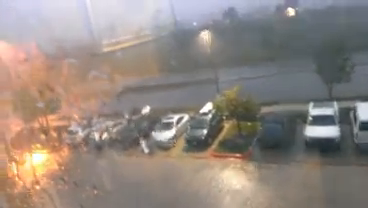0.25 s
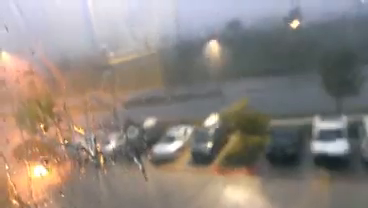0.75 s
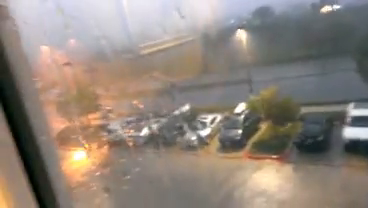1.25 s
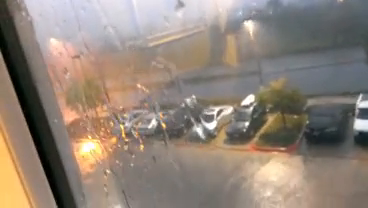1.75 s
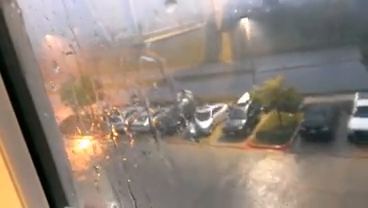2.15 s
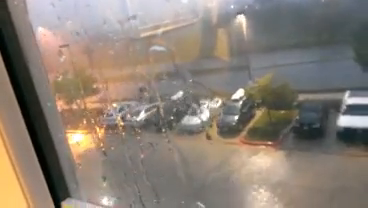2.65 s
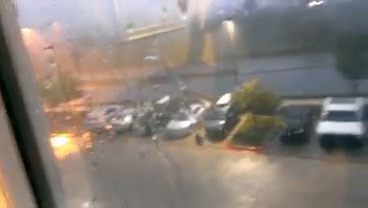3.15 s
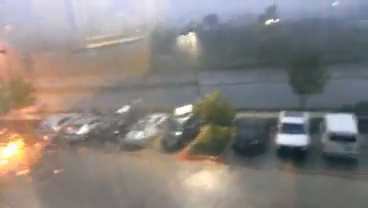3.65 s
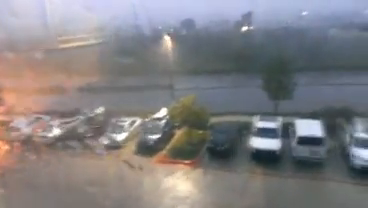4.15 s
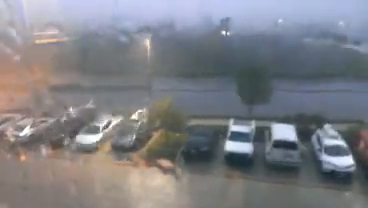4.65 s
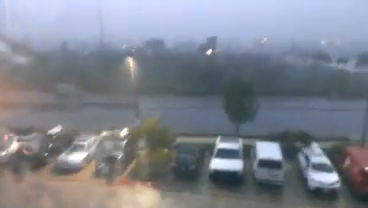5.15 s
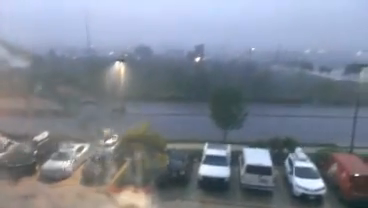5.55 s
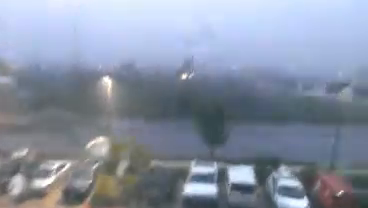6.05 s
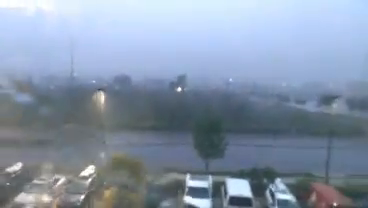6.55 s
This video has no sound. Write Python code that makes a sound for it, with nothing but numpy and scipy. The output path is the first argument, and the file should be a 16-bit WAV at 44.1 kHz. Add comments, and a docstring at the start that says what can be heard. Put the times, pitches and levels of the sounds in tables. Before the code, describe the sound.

Heard from a room, close to a wet window: gusts throw crackling spray at the glass, and separate big drops tick and knock sharply. Drips plop on the sill, a few dull thuds flex the pane, and fine patter fizzes throughout. The rain eases around the third second, then grows heavier with its loudest drops after four seconds. Outside, the downpour washes over a parking lot above a faint low rumble and hum.

```python
"""Heavy rain blows against a window in spells; the microphone stands close to the glass, in the room behind it.
Gusts throw sheets of fine spray at the pane and big drops tick on it: each blow shakes noisy, decaying modes.
Fat drips plop on the sill, dull thuds flex the pane and tiny bubbles plink: short rings of a few partials.
The water film fizzes and the sill patters with many chance-pitched rings; the pane drums softly.
Farther off, the downpour on the parking lot, a low rumble and a wavering hum are shaped noise."""
import sys
import numpy as np
from scipy import signal
from scipy.fft import rfft, irfft, next_fast_len
from scipy.io import wavfile
from scipy.ndimage import uniform_filter1d

SR = 44100
rng = np.random.default_rng(int(sys.argv[2]) if len(sys.argv) > 2 else 0)


def master_out(mix):
    """Clip the mix to full scale and print it as 16-bit PCM to the path in sys.argv[1]."""
    frames = np.transpose(np.atleast_2d(mix))
    ceiling = np.clip(frames, -1, 1)
    pcm = np.round(ceiling * 32767).astype(np.int16)
    wavfile.write(sys.argv[1], SR, pcm)


N = 299439


def amp(db):
    """Decibels to gain."""
    return 10 ** (np.asarray(db) / 20)


def unit(x):
    """Scale to rms 1."""
    return x / np.sqrt(np.mean(x ** 2) + 1e-20)


def along(points, hz):
    """Read (f/Hz, value) points on a log frequency axis."""
    f, v = np.transpose(points)
    return np.interp(np.log(hz + 1), np.log(f + 1), v)


def curves(rows):
    """One value per sample for each column after the time."""
    s, *cols = np.transpose(rows)
    return [np.interp(np.arange(N) / SR, s, c) for c in cols]


def filtered(x, response):
    """x times a response of frequency; zero padding gives the filter's tail room."""
    m = next_fast_len(N + 8192)
    gain = response(np.fft.rfftfreq(m, 1 / SR))
    return irfft(rfft(x, m) * gain, m)[:N]


def pane(times, drop_db, rise, lag, damping):
    """Drops shake the crowded modes of the glass; drop_db(Hz) gives each drop's strength in a band."""
    # the pane's answer to a drop: f/Hz, relative level/dB, t60/s before damping shortens it
    glass_modes = [(278, -4, 0.044), (750, -3.5, 0.023), (1380, -0.5, 0.05), (2235, -5.5, 0.09),
                   (3320, 2.5, 0.036), (4350, -4, 0.046), (4540, -1.5, 0.046), (6420, -7.5, 0.036),
                   (7200, -16.5, 0.039), (10020, -26, 0.062), (12300, -34, 0.036)]
    t = np.arange(SR // 10) / SR
    centres = np.array(glass_modes)[:, 0]
    at = np.clip(np.round(times * SR).astype(int), 0, N - 1)
    out = np.zeros(N)
    for (hz, db, t60), band in zip(glass_modes, np.eye(len(glass_modes))):
        # bending waves are dispersive: the treble arrives first and swells fastest
        slow = np.sqrt(3000 / hz)
        age = np.maximum(t - lag * slow, 0)
        swell = 1 - np.exp(-(age / (rise * slow)) ** 2)
        ring = swell * amp(-60 * age * damping / t60)
        blows = np.bincount(at, amp(db + drop_db(hz)) ** 2, N)
        power = np.abs(signal.oaconvolve(blows, ring ** 2)[:N])

        def band_gain(f):
            """Share of this band, falling off below the lowest mode."""
            return np.sqrt(along(np.c_[centres, band], f) * np.minimum(f / centres[0], 1) ** 4)

        modes = filtered(rng.standard_normal(N), band_gain)
        out += np.sqrt(power) * modes
    return out


def sheets():
    """Gain of the wind-blown sheets of small drops: each builds up, slowly thins out and dies away."""
    # gusts of spray: arrival at full strength t/s, length/s, level/dB halfway through
    gusts = [(0.0, 0.04, -49.5), (0.227, 0.054, -44), (0.49, 0.1, -47.5), (0.737, 0.086, -44),
             (0.86, 0.14, -51.5), (1.523, 0.15, -45.5), (1.76, 0.09, -44.5), (2.036, 0.1, -43),
             (2.235, 0.29, -49.5), (2.883, 0.14, -52.5), (3.134, 0.15, -45), (3.567, 0.12, -47),
             (3.66, 0.16, -44), (3.838, 0.14, -45.5), (3.999, 0.18, -41.5), (4.314, 0.29, -42.5),
             (4.79, 0.22, -49.5), (5.02, 0.1, -43), (5.31, 0.049, -46.5), (5.716, 0.023, -48.5),
             (5.872, 0.096, -40.5), (6.08, 0.22, -46), (6.52, 0.21, -49), (6.687, 0.08, -44.5)]
    attack_s, release_s, sag_db_per_s = 0.03, 0.062, 7
    t = np.arange(N) / SR
    power = np.zeros(N)
    for s, length, db in gusts:
        attack = np.clip(1 + (t - s) / attack_s, 0, 1)
        sag_db = sag_db_per_s * (np.clip(t - s, 0, length) - length / 2)
        release = np.exp(-np.maximum(t - s - length, 0) / release_s)
        power += (amp(db - sag_db) * attack * release) ** 2
    return np.sqrt(power)


def spray(level_db, count, spread_db, favour_db, colour_db, brighten):
    """Countless small drops shake the glass; harder sheets of rain splash brighter."""
    slot, rank = rng.random((count, 2)).T
    when = (np.arange(count) + slot) / count  # share of the whole duration
    sheet_db = level_db[(when * N).astype(int)]
    size_db = sheet_db + spread_db * rank ** 3  # few drops are large
    # size and place of impact decide which part of the pane's range a drop favours
    own_hz = 3200 * np.exp(rng.normal(0, 0.69, count))

    def drop_db(hz):
        """Strength of each drop in the band at hz."""
        favour = favour_db * np.exp(-(np.log(hz / own_hz) / 0.2) ** 2)
        treble = np.clip(np.log2(hz / 4500), 0, 1)
        splash = brighten * (sheet_db - sheet_db.mean()) * treble
        return size_db + favour + splash + colour_db * rng.standard_normal(count)

    ticks = pane(when * N / SR, drop_db, rise=.0009, lag=.0003, damping=1.1)
    return unit(ticks) * np.sqrt(np.mean(amp(level_db) ** 2))


def big_drops(gain_db=6.5, knock_db=11, splash_db=13, ping_db=-1.0, ping_share=1.0):
    """Single drops near the microphone shake the pane; a splashier drop also pings the upper modes harder."""
    # drops on the glass: t/s, level/dB before gain_db, knock/dB and splash/dB
    # (both relative to the body of the tick, before knock_db and splash_db)
    drops = [(0.216, -22.5, -21, -24), (0.2244, -32, -22, -6.5), (0.4948, -27.5, -13, -20.5),
             (0.529, -25.5, -14, -18), (0.561, -30.5, -13, -21), (0.719, -27.5, -10, -22),
             (0.7354, -22.5, -21, -23), (0.7538, -22, -16, -18), (0.806, -22, -12, -22),
             (0.859, -21, -17, -14.5), (0.9342, -26.5, -19, -24), (0.9732, -25.5, -21, -27),
             (1.0205, -17.5, -25, -7), (1.505, -24, -24, -16), (1.5856, -22.5, -20, -14.5),
             (1.5985, -21.5, -28, -10.5), (1.6126, -24, -28, -16), (1.705, -23.5, -15, -24.5),
             (1.773, -25, -23, -16.5), (1.826, -32, -3, -22), (1.8921, -23.5, -30, -14),
             (1.9444, -26.5, -23, -22), (2.0262, -30.5, -14, -11), (2.1228, -28.5, -12, -6.5),
             (2.4433, -35, -7, -6.5), (2.7011, -30.5, -13, -24), (2.7477, -32, -11, -12.5),
             (2.7721, -34, -6, -13.5), (2.837, -33.5, -16, -20), (2.8932, -28.5, -24, -14.5),
             (2.9854, -27.5, -22, -18), (3.0131, -34, -18, -13), (3.0921, -24, -9.5, -14),
             (3.1522, -21.5, -27, -18), (3.293, -34, -3, -15), (3.343, -25, -21, -8), (3.384, -39, 2, -1),
             (3.6144, -30.5, -13, -11), (3.9624, -23.5, -8, -13.5), (4.2934, -12, -18, -15.5),
             (4.396, -24, -10, -11), (4.4087, -26, -6, -11), (4.4565, -22, -23, -29), (4.5216, -29, -6, -5),
             (4.6438, -26, -16, -22), (4.79, -27.5, -10, -16), (4.9394, -32.5, -2, -5.5),
             (5.0393, -27, -9, -12.5), (5.1663, -10.5, -19, -14), (5.2123, -25, -17, -17),
             (5.3343, -28, -9, -29), (5.38, -25, -16, -23), (5.477, -32, -17, -16),
             (5.5147, -28, -9, -12.5), (5.8264, -27, -23, -7), (5.904, -32.5, 8, -11),
             (6.329, -28.5, -8, -27), (6.502, -25.5, -35, -15.5), (6.6255, -25.5, -2.5, -2),
             (6.7208, -26, -3, -18), (6.7461, -22, -4, -13)]
    s, db, knock, splash = np.transpose(drops)
    flat, bright = np.zeros(len(s)), splash + splash_db
    ping = ping_db + ping_share * bright
    colour = np.c_[flat, knock + knock_db, flat, ping, bright]
    colour_hz = [500, 1300, 3100, 5400, 8500]

    def drop_db(hz):
        """Strength of each drop in the band at hz."""
        return db + np.array([along(np.c_[colour_hz, c], hz) for c in colour])

    # the blow comes a moment before the time in the table, as the modes need time to swell
    ticks = pane(s - .001, drop_db, rise=.0008, lag=.0003, damping=1.25)
    return amp(gain_db) * ticks


def rings(events, partials, t60, rise, glide):
    """Each (t/s, level/dB, f/Hz) event rings (ratio, level/dB) partials; glide is the relative rise per second."""
    t = np.arange(SR // 5) / SR
    ratio, level = np.transpose(partials)[:, :, None]
    envelope = (1 - np.exp(-t / rise)) * amp(-60 * t / t60)
    out = np.zeros(N + len(t))
    for s, db, hz in events:
        detune = 1 + rng.normal(0, 0.0031, ratio.shape)
        cycles = hz * ratio * detune * t * (1 + glide * t / 2)
        ring = np.sum(amp(level) * np.sin(2 * np.pi * cycles), axis=0)
        out[round(s * SR):][:len(t)] += amp(db) * ring * envelope
    return out[:N]


def plops():
    """A fat drip rings a close cluster of sill modes for a few cycles."""
    # fat drips on the sill: t/s, level/dB before the gain below, base f/Hz
    drips = [(1.192, -23.5, 1100), (1.7658, -25.5, 1180), (2.067, -25, 1270), (3.0697, -26.5, 1170),
             (3.0974, -24, 1260), (3.9615, -25, 1650), (4.2476, -13, 1200), (4.2882, -16.5, 1280),
             (4.5603, -24, 1060), (5.0887, -19.5, 1194), (5.113, -19.5, 1160), (5.16, -22.5, 1420),
             (5.2602, -9.5, 1276), (5.907, -13, 1080), (5.9992, -20.5, 1060), (6.3034, -26.5, 1250),
             (6.7245, -29, 1370)]
    partials = [(0.99, 2.5), (1.035, -17), (1.26, -7), (4.2, -17)]
    return amp(3) * rings(drips, partials, t60=0.014, rise=0.002, glide=0)


def thuds():
    """Wind-blown sheets of rain slap the pane and flex it whole; its lowest modes give a dull, well damped
    knock."""
    # slaps of wind-blown sheets: t/s, level/dB before the gain below, base f/Hz
    sheet_slaps = [(0.724, -32, 205), (0.764, -25.5, 323), (1.019, -27.5, 337), (1.585, -34, 213),
                   (1.774, -23, 305), (4.05, -21.5, 247), (4.403, -29, 348), (5.359, -27, 371),
                   (6.623, -23, 349)]
    partials = [(1.014, 0), (0.8, -15.0), (1.316, -9.5), (1.92, -8.5)]
    return amp(-4.5) * rings(sheet_slaps, partials, t60=0.047, rise=0.0012, glide=0)


def plinks():
    """A tiny bubble in the water film rings briefly and rises in pitch as it surfaces."""
    # bubbles: t/s, level/dB before the gain below, starting f/Hz
    bubbles = [(0.125, -39, 5500), (2.7357, -30.5, 5560), (2.9357, -25.5, 4700), (3.1892, -25, 5200),
               (3.9937, -33, 5360), (5.968, -19, 5560)]
    return amp(3) * rings(bubbles, [(1, -2.5), (1.1, -12)], t60=0.013, rise=0.00031, glide=17)


def patter(body, centre_hz, count, spread_db, scatter, t60):
    """Many small drops, each a short ring at a chance pitch, coloured by the body they land on; rms 1."""
    when, rank, phase = rng.random((count, 3)).T[:, :, None]
    hz = np.minimum(centre_hz * np.exp(rng.normal(0, scatter, (count, 1))), SR / 3)
    t = np.arange(SR // 64) / SR
    swell = 1 - np.exp(-t * hz / 2)  # the ring builds up over about two cycles
    decay = amp(spread_db * rank ** 4 - 60 * t / t60)
    drops = decay * swell * np.sin(2 * np.pi * (hz * t + phase))
    at = (when * N).astype(int) + np.arange(len(t))
    drips = np.bincount(at.ravel(), drops.ravel(), N)[:N]
    return unit(filtered(drips, lambda f: amp(along(body, f))))


def film_fizz(spray_db):
    """Droplets that land in the running water film fizz along with the spray, 6 dB below it."""
    # colour of the film on the glass: f/Hz, relative level/dB
    film_colour = [(1200, -24), (2500, 4.5), (4000, -3), (5800, 2.5), (6800, -14.5), (9000, -11.5),
                   (12000, -22)]
    fizz = patter(film_colour, centre_hz=4200, count=2400, spread_db=14, scatter=.36, t60=.015)
    return amp(spray_db - 6) * fizz


def sill_patter(heavier_db):
    """Small drops ring the sill; both its resonances get louder in harder rain, the lower a little faster."""
    # the sill's lower and upper resonance: f/Hz, relative level/dB
    lower_body = [(300, -22), (700, -0.5), (1000, -6), (1300, -2), (1600, -10.5), (2200, -34), (7000, -44)]
    upper_body = [(1800, -33), (2500, -6), (2950, -5.5), (3400, -5.5), (4500, -22)]
    # level in usual rain (dB), and dB gained per dB of heavier rain
    lower_db, lower_grows = -51.5, 1.8
    upper_db, upper_grows = -54.5, 1.57
    lower = patter(lower_body, centre_hz=1276, count=1800, spread_db=7.5, scatter=0.231, t60=0.016)
    upper = patter(upper_body, centre_hz=2954, count=1800, spread_db=11, scatter=0.097, t60=0.015)
    return amp(lower_db + lower_grows * heavier_db) * lower + amp(upper_db + upper_grows * heavier_db) * upper


def room(x, t60=0.13, gap=0.0031):
    """The short tail of a furnished room, a decaying noise burst after a gap, softened in the treble."""
    t = np.arange(SR // 3) / SR
    tail = rng.standard_normal(len(t)) * amp(-60 * t / t60) * (t > gap)
    wet = signal.oaconvolve(x, tail / np.linalg.norm(tail))[:N]
    return filtered(wet, lambda f: 1 / np.sqrt(1 + (f / 6000) ** 4))


def rush(spectrum, patchy_db):
    """Coloured noise of rms 1 with patches of random gain in time and frequency."""
    z = signal.stft(rng.standard_normal(N), nperseg=512)[2]
    field = uniform_filter1d(rng.standard_normal(z.shape), size=6, axis=0)
    field = uniform_filter1d(field, size=10, axis=1)
    x = signal.istft(z * amp(patchy_db * unit(field)), nperseg=512)[1][:N]
    return unit(filtered(x, lambda hz: amp(along(spectrum, hz))))


def drumming(heavier_db, spray_db):
    """The pane drums softly: patchy low noise that grows with the rain and partly follows the spray."""
    # colour of the drumming: f/Hz, relative level/dB
    drum_colour = [(60, -20), (110, -3), (135, -3.5), (165, -4), (210, 2), (275, -5), (345, 0), (430, -5.5),
                   (650, -10), (1000, -16.5), (2000, -73)]
    # dB per dB of heavier rain, and of spray above its mean
    grows, follows_spray = 0.62, 0.31
    drum_db = -48 + grows * heavier_db + follows_spray * (spray_db - spray_db.mean())
    return amp(drum_db) * rush(drum_colour, patchy_db=3.0)


def downpour_wash(heavier_db):
    """The downpour over the parking lot outside merges into patchy noise that grows with the rain."""
    # colour of the wash: f/Hz, relative level/dB
    wash_colour = [(100, 6), (300, 5.5), (500, 1), (700, -3.5), (950, 0), (1250, 5.5), (2000, 5),
                   (3000, -1.5), (4200, -2.5), (5600, -6), (7000, -21), (12000, -34.5)]
    # level in usual rain (dB), and dB gained per dB of heavier rain
    usual_db, grows = -45, 0.81
    return amp(usual_db + grows * heavier_db) * rush(wash_colour, patchy_db=2.0)


def rumble():
    """A low rumble under the rain: nearly even noise in the deep bass, with a drifting level."""
    # colour of the rumble: f/Hz, relative level/dB
    rumble_colour = [(10, -9), (20, -6.5), (27, -2), (38, -7), (55, -15), (85, -21.5), (150, -17),
                     (400, -86)]
    # its course: t/s, level/dB
    rumble_course = [(0, -46), (0.55, -52), (0.85, -47), (1.3, -47), (2.7, -46.5), (3.7, -49.5),
                     (5.8, -44.5), (6.0, -41.5), (6.25, -48), (6.79, -49.5)]
    return amp(curves(rumble_course)[0]) * rush(rumble_colour, patchy_db=0.5)


def hum(hz=98, half_width_hz=8):
    """A wavering low drone: a band of noise so narrow that its strength wanders."""
    # its course: t/s, level/dB
    hum_course = [(0, -50), (0.6, -52.5), (1.2, -55), (2.9, -53.5), (3.7, -57.5), (5.7, -55.5), (6.79, -64)]
    drone = filtered(rng.standard_normal(N), lambda f: 1 / (1 + ((f - hz) / half_width_hz) ** 4))
    return amp(curves(hum_course)[0]) * unit(drone)


def scene():
    """Rain on glass and sill close by, the wash of the downpour outside, rumble and hum underneath."""
    # how hard it rains; drives wash, sill, drumming and steady spray: t/s, strength/dB
    rain_course = [(0.0, -49), (0.43, -49.5), (0.74, -45), (1.19, -50.5), (1.93, -46), (2.27, -46.5),
                   (2.68, -52), (3.57, -50), (4.42, -39.5), (4.65, -44), (4.82, -43.5), (5.09, -40.5),
                   (5.54, -46), (5.77, -44), (6.09, -39.5), (6.35, -48), (6.58, -45), (6.79, -42)]
    heavier_db = curves(rain_course)[0] + 46  # usual rain is -46 dB
    steady_spray_db = -53.5 + heavier_db
    spray_db = 20 * np.log10(np.hypot(amp(steady_spray_db), sheets()))
    glass = spray(spray_db, count=900, spread_db=11.0, favour_db=7.5, colour_db=2.5, brighten=0.8)
    near = big_drops() + plops() + thuds() + plinks()
    near_in_room = near + amp(-12.0) * room(near)
    wet_surfaces = film_fizz(spray_db) + sill_patter(heavier_db)
    background = drumming(heavier_db, spray_db) + downpour_wash(heavier_db) + rumble() + hum()
    return (glass + near_in_room + wet_surfaces + background)[None]


def record(dry):
    """The microphone's chain cuts off very steeply above its band limit."""
    top_hz = 12100
    return np.array([filtered(x, lambda hz: 1 / np.sqrt(1 + (hz / top_hz) ** 200)) for x in dry])


dry = scene()
out = record(dry)
master_out(out)
```